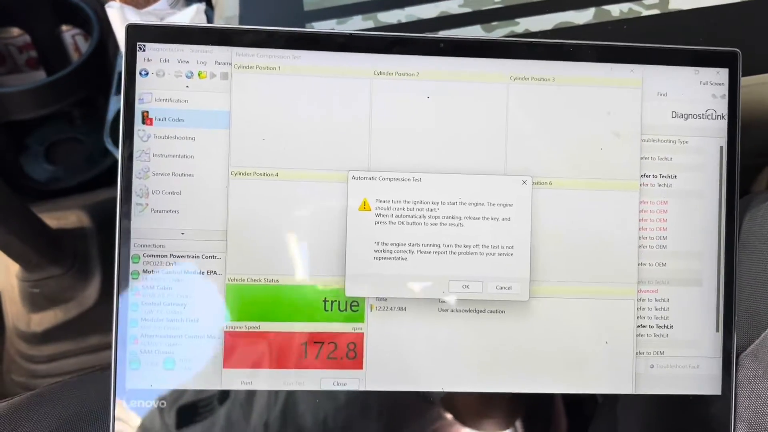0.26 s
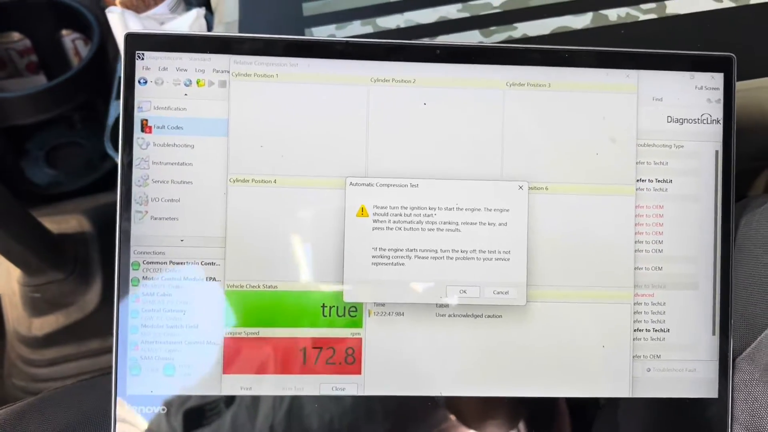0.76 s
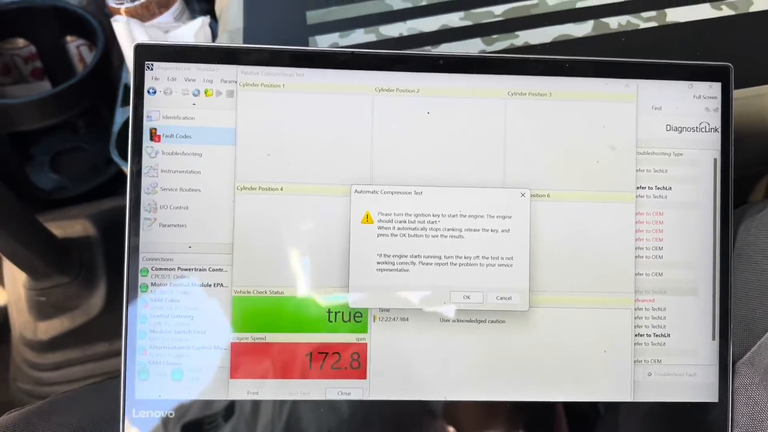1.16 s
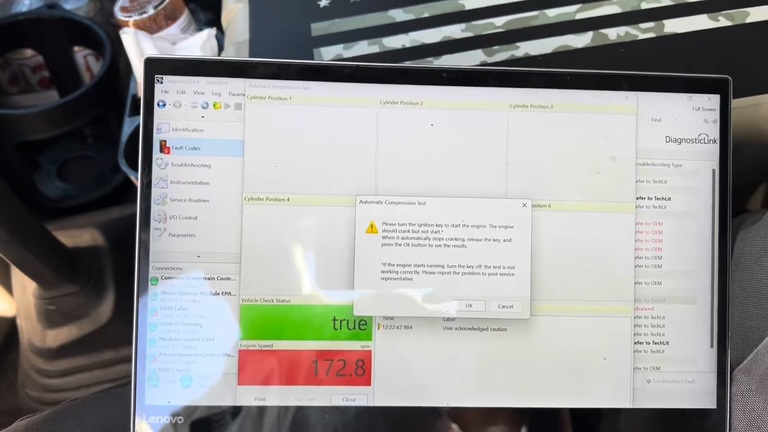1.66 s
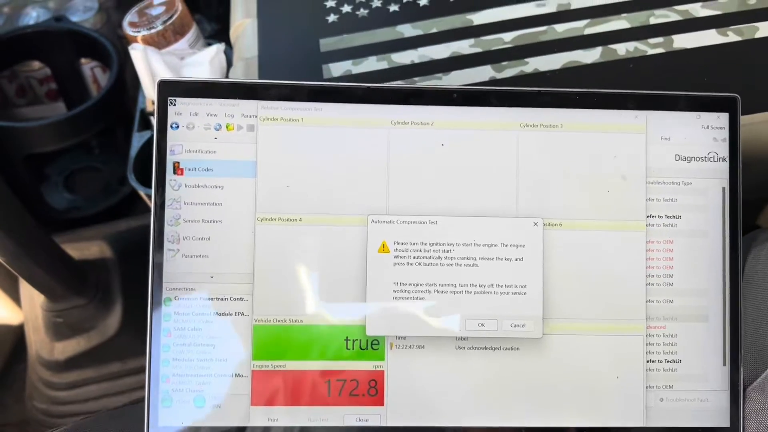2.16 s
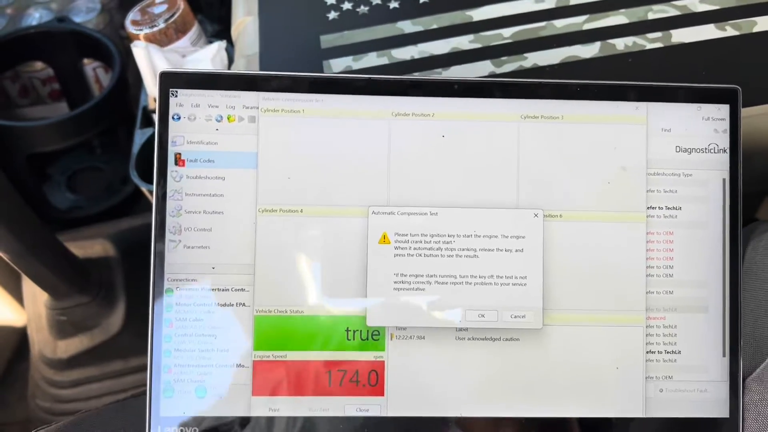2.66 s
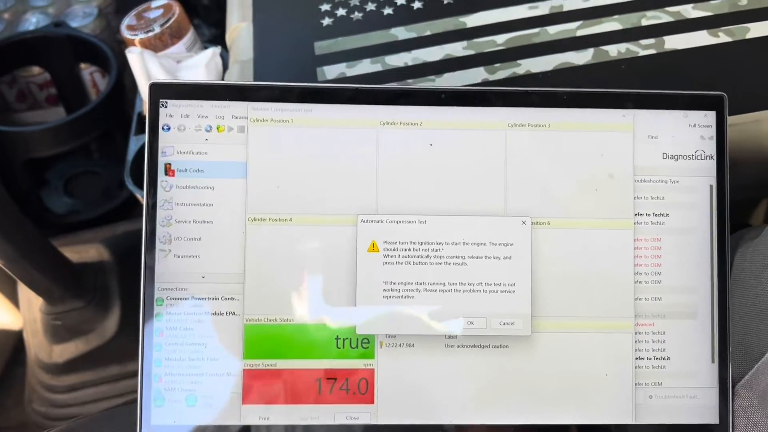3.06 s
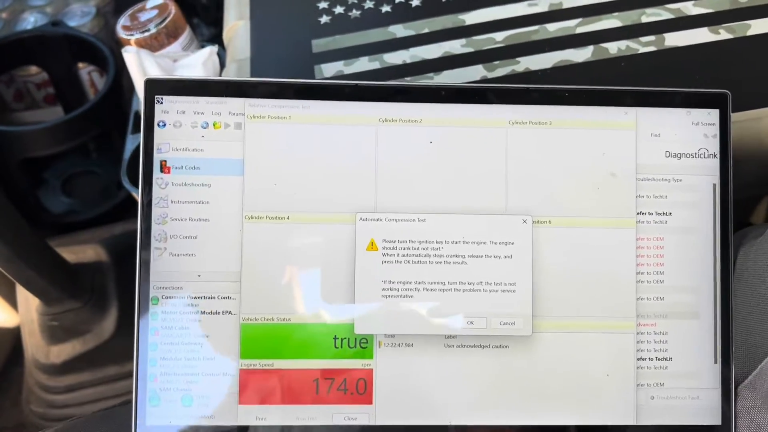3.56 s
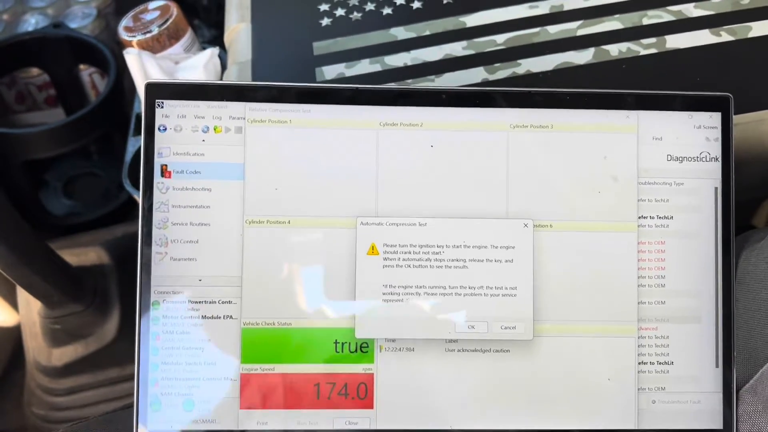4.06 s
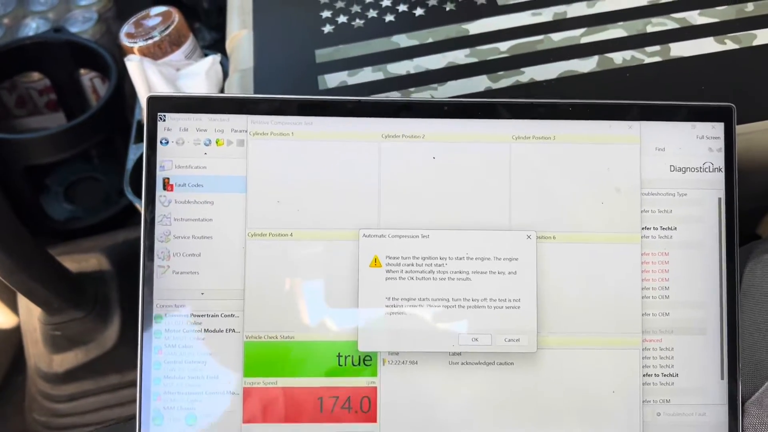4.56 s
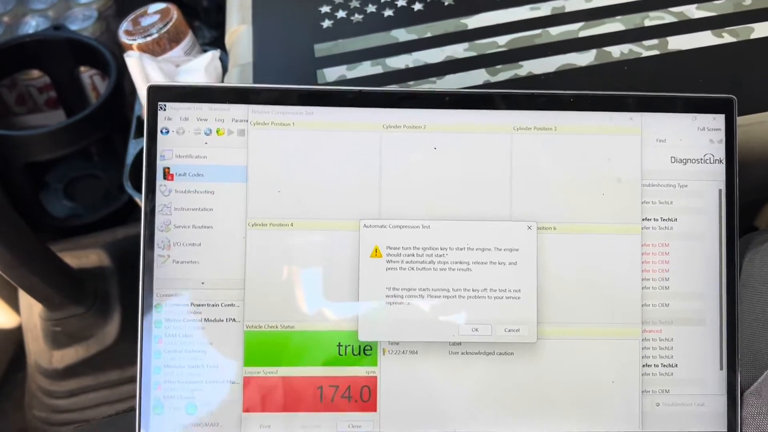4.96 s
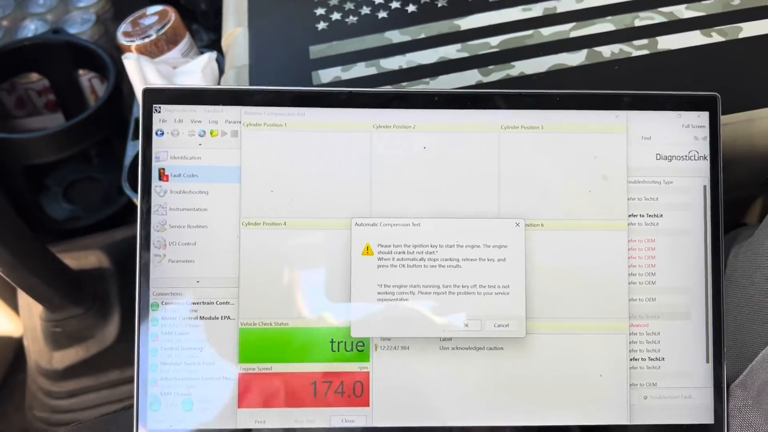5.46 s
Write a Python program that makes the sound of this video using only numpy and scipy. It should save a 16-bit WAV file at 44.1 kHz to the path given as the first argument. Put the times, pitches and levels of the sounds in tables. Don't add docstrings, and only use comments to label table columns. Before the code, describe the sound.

From 0 to about 5.7 seconds a large diesel engine is cranked continuously by its starter and never fires, heard inside a parked truck's cab. The sound is already under way at the start and cuts off still turning. Compression strokes come almost nine times a second, a fast even chug that slows only very slightly. Each brings a low cab boom, a shudder of the mounts, a metallic knock, a brief hollow ring of the housing and a burst of dense, dry gear clatter. Beneath lie a steady low starter hum, pulsing slightly with the strokes, and a soft deep rumble. Knocks vary from stroke to stroke: moderate at first, often harder from about 1.9 seconds, strong near 4, then uneven towards the end. The housing ring gradually fades. The close stereo phone pickup is bass-heavy, with brighter rattle spread wide by glass and trim.

```python
import sys
import numpy as np
from scipy import signal
from scipy.fft import rfft, irfft
from scipy.io import wavfile
from scipy.ndimage import map_coordinates

SR = 44100
rng = np.random.default_rng(int(sys.argv[2]) if len(sys.argv) > 2 else 0)


def dump_mix(stems):
    frames = np.atleast_2d(stems).T
    limited = np.clip(frames, -1, 1)
    pcm = np.round(limited * 32767).astype(np.int16)
    wavfile.write(sys.argv[1], SR, pcm)


def gain_from_db(level_db):
    decades = np.asarray(level_db, float) / 20
    return 10 ** decades


N = 251105
HZ = np.fft.rfftfreq(N, 1 / SR)


def level(x, db):
    return x * gain_from_db(db) / np.sqrt(np.mean(x ** 2))


def shape(points):
    hz, db = np.transpose(points)
    return gain_from_db(np.interp(np.log(HZ + 1), np.log(hz), db))


def colour(x, gain):
    return irfft(rfft(x) * gain, N)


def strike(times, sizes, kernel):
    train = np.zeros(N + SR)
    train[(np.asarray(times) * SR).astype(int)] = sizes
    return signal.fftconvolve(train, kernel)[:N]


def swing(times, db, delay, hz, rise, t60, trim_db, loose, slip_hz):
    t = np.arange(SR // 4) / SR
    swell = (1 - np.exp(-(t / rise) ** 2)) * np.exp(-np.log(1000) * t / t60)
    swell = swell / swell.max()
    size = gain_from_db(db + trim_db)
    slip = 2 * np.pi * slip_hz * times
    in_phase = np.sqrt(2) * swell * np.sin(2 * np.pi * hz * t)
    quadrature = np.sqrt(2) * swell * np.cos(2 * np.pi * hz * t)
    steady = strike(times + delay, size * np.cos(slip), in_phase)
    steady += strike(times + delay, size * np.sin(slip), quadrature)
    resonance = 1 / (1 + ((HZ - hz) / (6 + 0.0424 * hz)) ** 2)
    shake = level(colour(rng.standard_normal((3, N)), resonance), 0)
    shake = shake * strike(times + delay, size, swell)
    shake[0] = np.sqrt(1 - loose ** 2) * steady + loose * shake[0]
    return shake


# (time [s], knock level [dB], clatter level [dB])
FRONT_CROSSINGS = [(0.033, -37, -58), (0.26, -34.5, -62), (0.493, -35, -55.5), (0.719, -34, -51.5),
                   (0.95, -43, -50), (1.177, -41, -53.5), (1.411, -39.5, -52), (1.635, -41, -49.5),
                   (1.874, -31.5, -53.5), (2.101, -29.5, -57), (2.333, -30, -49.5), (2.564, -31, -52),
                   (2.799, -30, -56.5), (3.027, -30.5, -51), (3.254, -34, -50), (3.489, -34.5, -48),
                   (3.716, -29, -54.5), (3.95, -28.5, -49.5), (4.184, -27.5, -52.5), (4.405, -36.5, -51.5),
                   (4.646, -33, -54.5), (4.877, -35, -51.5), (5.103, -44, -47), (5.339, -52.5, -49),
                   (5.57, -41, -47)]
REAR_CROSSINGS = [(0.142, -36, -52), (0.373, -41, -54.5), (0.605, -36, -52), (0.84, -30, -58),
                  (1.07, -30.5, -56), (1.301, -29, -56.5), (1.527, -34.5, -57), (1.759, -39, -52),
                  (1.985, -30, -52), (2.212, -47, -48.5), (2.445, -37, -52), (2.675, -37.5, -52),
                  (2.905, -52.5, -54), (3.14, -43, -54), (3.367, -33.5, -53), (3.598, -42, -51.5),
                  (3.831, -30.5, -48.5), (4.061, -32.5, -46), (4.295, -28.5, -47.5), (4.523, -49, -52.5),
                  (4.76, -48, -51.5), (4.99, -29.5, -57), (5.224, -27.5, -57), (5.459, -38, -56.5),
                  (5.684, -32.5, -53)]


def crossings():
    s, knock_db, clatter_db = np.transpose(sorted(map(tuple, FRONT_CROSSINGS + REAR_CROSSINGS)))
    usual_knock_db, usual_clatter_db = -36, -52
    return s, knock_db, knock_db - usual_knock_db, clatter_db - usual_clatter_db


def stroke_times():
    first_s, stroke_s, slowing_s = .03, .11478, .0000125
    k = np.arange(len(FRONT_CROSSINGS + REAR_CROSSINGS) - 1)
    return first_s + stroke_s * k + slowing_s * k ** 2


# (multiple of the turning rate [1], level [dB])
ARMATURE_HARMONICS = [(1, -33.5), (2, -48), (3, -51)]


def starter():
    s = stroke_times()
    t = np.arange(N) / SR
    stroke = 2 * np.pi * np.polyval(np.polyfit(s, np.arange(len(s)), 2), t)
    armature_hz = 55.45
    turn = 2 * np.pi * armature_hz * t + 0.3 * np.sin(stroke + 2.0) + 0.585 * np.sin(2 * stroke + 0.17)
    return sum(np.sqrt(2) * gain_from_db(db) * np.sin(k * turn) for k, db in ARMATURE_HARMONICS)


# (frequency [Hz], density [dB per Hz])
RUMBLE_COLOUR = [(14, -47), (24, -13.5), (40, -2.5), (90, 2.5), (115, 0), (170, -4.5), (285, -18.5),
                 (430, -39.5), (800, -120)]


def rumble():
    return level(colour(rng.standard_normal((3, N)), shape(RUMBLE_COLOUR)), -30)


# (cab boom level [dB], housing ring level [dB])
CYLINDER_LEVELS = [(-32.8, -30.5), (-23.5, -33), (-29.5, -32.5), (-26.5, -32), (-24, -33.5), (-27.5, -31.5)]
# (time [s], level [dB])
ROCKING_EFFORT = [(0, -1.5), (.7, -.5), (1.2, -2), (1.7, 2), (2.4, -.5), (3.1, .5), (3.8, -.5), (4.5, .5),
                  (5.7, .3)]
# (delay [s], frequency [Hz], rise [s], t60 [s], trim [dB], loose share [0-1],
# slip of the push against the crank [Hz])
STROKE_SWINGS = [
    (0.010054, 135.17, 0.02066, 0.1102, 2.5, 0.21, 1.149),
    (0.04521, 86.54, 0.0157, 0.101, 1, 0.35, 0.0833),
    (0.08765, 56, 0.0083, 0.0995, 0.5, 0.31, 0.0605),
    (.076, 202.8, 0.0162, 0.0472, 1, 0.45, 0.0393),
]
BOOM_EDGE_SWING = (.008, 194.5, -2.1, 0.03, -13, 0.63, 0)


def block():
    s = stroke_times()
    k = np.arange(len(s))
    boom_db = np.resize(np.transpose(CYLINDER_LEVELS)[0], len(k)) + np.interp(s, *np.transpose(ROCKING_EFFORT))
    shudder_db = -29.5 + .25 * crossings()[3][k]
    heave_db = -30 + 3 * np.cos(2 * np.pi * (.41 * k - 0.3))
    pan_db = -37.5 - 0.31 * s
    levels = [boom_db, shudder_db, heave_db, pan_db]
    swings = sum(swing(s, db, *mode) for db, mode in zip(levels, STROKE_SWINGS))
    return swings + swing(s, boom_db, *BOOM_EDGE_SWING)


# (delay [s], frequency [Hz], rise [s], t60 [s], trim [dB], loose share [0-1], slip [Hz])
KNOCK_SWING = (-.002, 1212, .003, .07, 0, .35, 0)


def knock():
    s, knock_db, _, _ = crossings()
    return swing(s, knock_db, *KNOCK_SWING)


# (usual level [dB], rise per dB of clatter [dB], rise per dB of knock [dB])
CLATTER_BALANCE = [
    (-36.9, .33, -0.0754),
    (-44.5, .42, 0.06),
    (-52.3, .85, 0.02),
    (-51.5, .95, 0.14),
]


def spells():
    s, _, hard_db, busy_db = crossings()
    return s, [db + busy * busy_db + hard * hard_db for db, busy, hard in CLATTER_BALANCE]


def patchy(x, depth_db, span_hz, span_s):
    hz, t, cells = signal.stft(x, SR, nperseg=512)
    field = rng.standard_normal((80, 600))
    field = map_coordinates(field, np.meshgrid(hz / span_hz, t / span_s, indexing="ij"), order=1)
    return signal.istft(cells * gain_from_db(depth_db * field), SR, nperseg=512)[1][:, :N]


# (low edge [Hz], high edge [Hz], delay [s], rise [s], hold [s], fall [s], trim [dB],
# level between strokes [dB])
CLATTER_SPELLS = [
    (218.6, 1314.4, -0.00433, 0.00364, 0.04876, 0.03167, 2, -9),
    (1509, 3866, -0.0059, 0.009, 0.0522, 0.0256, 0, -8),
    (4404, 8716, -0.0027, 0.0194, 0.0409, 0.0331, 0.5, -8),
    (9130, 27000, -0.004, .015, 0.045, 0.025, -16, -8.5),
]
# (frequency [Hz], density [dB per Hz])
CASING_COLOUR = [(230, -5), (310, -8), (420, -4), (554, -6.5), (997, -10), (1200, -8.5), (1820, -21),
                 (2980, -25), (8300, -37), (10200, -40), (11400, -37), (12600, -47), (14400, -46),
                 (15000, -39), (15500, -49)]
# (frequency [Hz], width [Hz], level over the casing [dB])
CASING_RESONANCES = [(484, 25, 5), (701, 27, 5), (790, 30, 3), (945, 30, 6), (1104, 22, 7), (1180, 28, 5),
                     (1323, 22, 5), (1421, 25, 4), (1656, 22, 7), (1792, 20, 4), (2465, 25, 5),
                     (2583, 28, 7), (2906, 32, 5), (3010, 60, 3), (3155, 25, 5), (3704, 60, 4),
                     (4000, 50, 3), (4451, 50, 4), (4620, 50, 4), (6614, 70, 4)]


def clatter():
    s, db = spells()
    chance = rng.random((2, 3, N))
    clicked = chance[0] < 8000 / SR
    sizes = gain_from_db(-np.log(chance[1] + 1e-9))
    clicks = clicked * sizes * rng.standard_normal((3, N))
    casing = shape(CASING_COLOUR) * (HZ < 15720)
    for hz, width, mode_db in CASING_RESONANCES:
        casing = casing * (1 + (gain_from_db(mode_db) - 1) / (1 + (2 * (HZ - hz) / width) ** 2))
    clicks = rfft(patchy(clicks, depth_db=2.5, span_hz=300.4, span_s=.03)) * casing
    t = np.arange(SR // 4) / SR
    out = 0
    for spell_db, (lo_hz, hi_hz, delay, rise, hold, fall, trim_db, rest_db) in zip(db, CLATTER_SPELLS):
        band = 1 / np.sqrt((1 + (lo_hz / (HZ + 1)) ** 16) * (1 + (HZ / hi_hz) ** 16))
        spell = (1 - np.exp(-t / rise)) * np.exp(-np.maximum(t - hold, 0) / fall)
        gate = strike(s + delay, gain_from_db(spell_db), spell) + gain_from_db(np.mean(spell_db) + rest_db)
        out = out + level(irfft(clicks * band, N), trim_db) * gate
    return out


# (delay [s], frequency [Hz], rise [s], t60 [s], trim [dB], loose share [0-1], slip [Hz])
CASING_WHINE_SWING = (.015, 1110, .02, 0.13, -3, 0.44, 0)


def casing_whine():
    s, db = spells()
    return swing(s, db[0], *CASING_WHINE_SWING)


# (delay [s], frequency [Hz], rise [s], t60 [s], trim [dB], loose share [0-1], slip [Hz])
HOUSING_RING = (.002, 422, .012, 0.1, .6, .38, 0)
HOUSING_RING_LOW = (.004, 372, .015, .12, -6, .5, 0)


def housing_ring(mode):
    s, _, hard_db, _ = crossings()
    ring_db = np.resize(np.transpose(CYLINDER_LEVELS)[1], len(s)) + 1 - 0.344 * s + 0.077 * hard_db
    return swing(s, ring_db, *mode)


# (frequency [Hz], scattered over direct [dB])
SCATTER = [(60, -24.5), (170, -15), (400, -7), (1200, -2), (2200, 5), (6500, 5.5), (8000, -1),
           (8600, -13.5), (9500, -10.5)]
# (frequency [Hz], left minus right [dB])
PORT_LEAN = [(60, 0.24), (170, -1.71), (340, -3.5), (520, 2), (700, 0.5), (1500, -2.5), (2600, 0.7),
             (6700, 3.5), (8300, 1)]
# (frequency [Hz], lead of the left port [rad])
PORT_LEAD = [(100, 0), (400, .8), (1300, .8), (6000, .7), (8790, .1), (9730, -3.1), (10900, -3.3),
             (11500, -6.3), (12500, -6.3), (13200, -9.4), (14300, -9.5), (15000, -12.5)]


def cab(x, lag):
    spread = shape(SCATTER)
    lean = np.sqrt(shape(PORT_LEAN))
    direct, left, right = rfft(x) / np.sqrt(1 + spread ** 2)
    late = np.exp(-1j * (np.interp(HZ, *np.transpose(PORT_LEAD)) + 2 * np.pi * HZ * lag))
    left_port = lean * (direct + spread * left)
    right_port = (late * direct + spread * right) / lean
    return irfft([left_port, right_port], N)


def scene():
    engine = starter() + rumble() + block()
    gears = knock() + clatter() + casing_whine() + housing_ring(HOUSING_RING_LOW)
    ends = signal.windows.tukey(N, .002)
    ring = cab(ends * housing_ring(HOUSING_RING), lag=0.00033)
    return cab(ends * (engine + gears), lag=0) + gain_from_db(1.0) * ring


def low_pass(x):
    return signal.sosfilt(signal.butter(12, 17080, fs=SR, output="sos"), x)


def record(dry):
    return low_pass(dry)


dry = scene()
out = record(dry)
dump_mix(out)
```